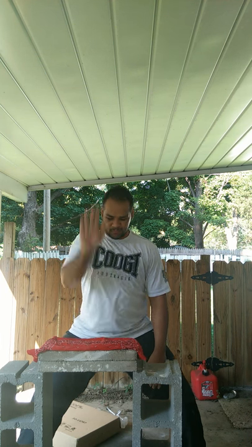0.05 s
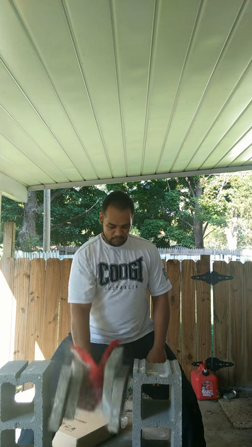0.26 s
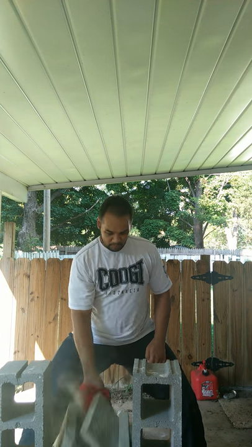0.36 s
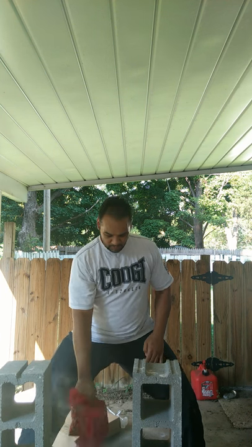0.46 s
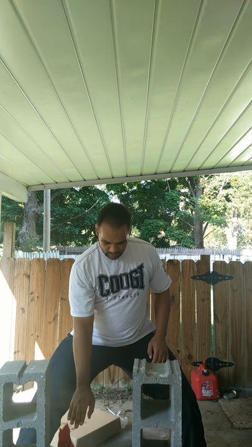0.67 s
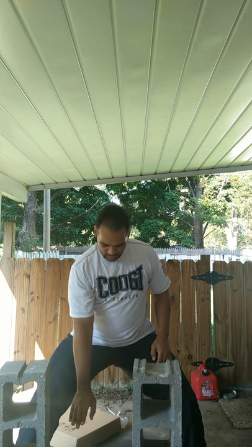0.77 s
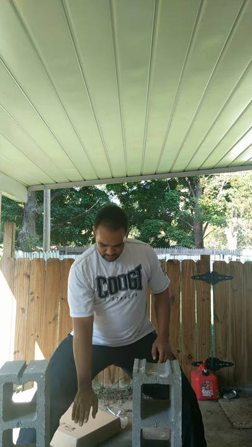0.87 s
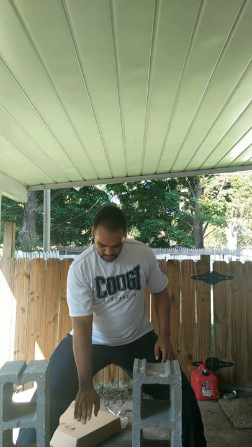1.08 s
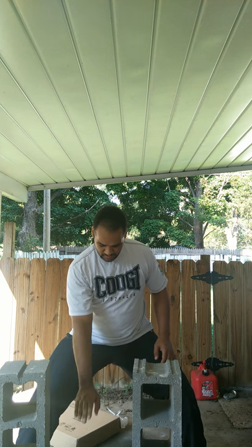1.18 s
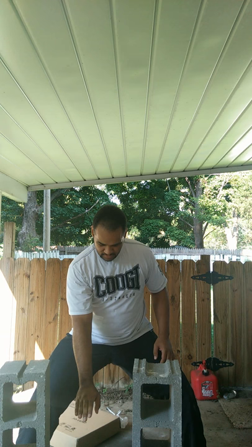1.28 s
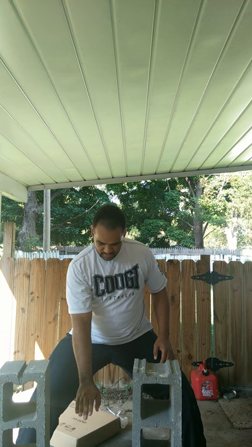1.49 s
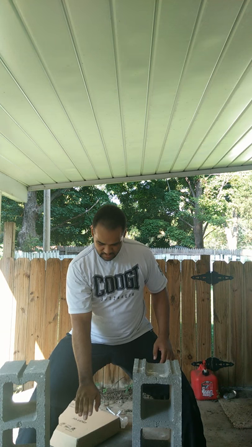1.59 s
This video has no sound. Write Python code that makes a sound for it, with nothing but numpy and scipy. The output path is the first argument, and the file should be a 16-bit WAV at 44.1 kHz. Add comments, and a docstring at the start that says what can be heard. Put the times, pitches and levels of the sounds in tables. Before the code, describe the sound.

Concrete breaks with one loud crack, close to the microphone on a covered patio. The pieces knock and grind as they fall, hit a cardboard box and topple onto paving, rocking to rest against a faint outdoor hiss and rumble.

```python
"""A faint high hiss and low rumble lie outdoors; then a hand snaps two stacked concrete slabs.
The halves knock and grind together as they drop, thud onto a cardboard box, topple on the paving
and rock to rest. Each impact is an impulse with a burst of crumbling, and some leave a half ringing
in its normal modes. A patio roof reflects each blow, and a small microphone close by overloads."""
import sys
import numpy as np
from scipy import signal
from scipy.fft import rfft, irfft
from scipy.io import wavfile

SR = 44100
rng = np.random.default_rng(int(sys.argv[2]) if len(sys.argv) > 2 else 0)


def store_wav(level_fs):
    """Save 16-bit WAV to argv[1]."""
    pcm = np.round(np.clip(np.atleast_2d(level_fs), -1, 1) * 32767)
    wavfile.write(sys.argv[1], SR, pcm.T.astype(np.int16))


N = 72765


def amp(db):
    """Amplitude ratio of a level in decibels."""
    return 10 ** (np.asarray(db) / 20)


def unit_rms(x):
    """Normalisation to an rms of 1."""
    return x / np.sqrt(np.mean(abs(x) ** 2) + 1e-20)


def curve_at(points, hz):
    """Interpolation of (f, value) points on a logarithmic frequency axis."""
    f, value = np.transpose(points)
    return np.interp(np.log(hz + 1), np.log(f), value)


def add(mix, start_s, sound):
    """Superposition: a sound adds to the mix from its onset."""
    part = mix[round(start_s * SR):][:len(sound)]
    part += sound[:len(part)]


def coloured(x, spectrum, edge_hz, size=4096):
    """Minimum-phase filtering to a spectrum, with a third-order roll-off above the edge."""
    hz = abs(np.fft.fftfreq(size, 1 / SR))
    gain = amp(curve_at(spectrum, hz)) / np.sqrt(1 + (hz / edge_hz) ** 6)
    log_response = np.conj(signal.hilbert(np.log(gain + 1e-5)))
    taps = np.fft.ifft(np.exp(log_response)).real
    return signal.fftconvolve(x, taps[:size // 2])


def equalised(x, spectrum):
    """Zero-phase filtering of a full-length signal to a spectrum."""
    return irfft(rfft(x) * amp(curve_at(spectrum, np.fft.rfftfreq(N, 1 / SR))), N)


# Spectrum of the outdoor background: f/Hz, level/dB
OUTDOOR_SPECTRUM = [(25, -23), (40, -11.5), (58, -4), (80, -5), (130, -12), (250, -21.5), (450, -27.5),
                    (1000, -27.5), (2000, -30), (3000, -31), (3500, -14), (5100, -3), (6000, -6),
                    (7100, -14.5), (9000, -7.5), (10300, -19.5), (11400, -15), (12500, -26), (16000, -50.5)]
def outdoors(level_db=-48, swell_db=0.66):
    """Ambient noise, weakly modulated: a high hiss, likely insects in the trees, over a distant rumble."""
    t = np.arange(N) / SR
    air = equalised(rng.standard_normal(N), OUTDOOR_SPECTRUM)
    swell = sum(np.sin(2 * np.pi * (hz * t + rng.random())) for hz in np.geomspace(1, 25, 20))
    return amp(level_db + swell_db * unit_rms(swell)) * unit_rms(air)


# Early reflections off floor and roof: delay/s, amplitude ratio
ECHOES = [(.0047, .25), (0.0145, .3), (.0225, .12)]
# Reverberation time of the patio: f/Hz, T60/s
PATIO_T60 = [(60, 0.29), (150, 0.39), (400, 0.31), (1000, 0.2), (2800, 0.28), (6000, .22), (12000, 0.22)]
# Hollow resonances of the patio: f/Hz, level/dB, T60/s
HOLLOWS = [(108, -12, 1.2), (138, -4, .9), (210, -4, .42), (274, -9, .3), (412, -14, .3), (465, -3, .6),
           (628, -9, .3), (807, 0, .45)]
def patio(x, tail_db=-3.5, rise_s=0.0029):
    """Convolution with an impulse response: a diffuse tail, early reflections and damped resonances."""
    t = np.arange(SR) / SR
    reflections = rng.standard_normal(SR) * (rng.random(SR) < .15)
    hz, frame_s, bands = signal.stft(reflections, SR, nperseg=256)
    decay = amp(-60 * frame_s / curve_at(PATIO_T60, hz)[:, None])
    tail = signal.istft(bands * decay, SR, nperseg=256)[1][:SR]
    tail *= np.minimum(t / rise_s, 1) ** 2
    response = amp(tail_db) * tail / np.linalg.norm(tail)
    for delay_s, gain in ECHOES:
        add(response, delay_s, np.array([gain]))
    for mode_hz, db, t60 in HOLLOWS:
        scale = 2 * np.log(1000) / (t60 * SR)  # makes db the gain at resonance
        response += scale * amp(db - 60 * t / t60) * np.cos(2 * np.pi * mode_hz * t)
    return signal.fftconvolve(x, response)[:N]


# Showers of concrete crumbs: t/s, duration/s, level/dB, treble edge/Hz
SHOWERS = [(0.440, 0.32, -34.5, 6990), (0.467, 0.039, -43, 8000), (0.576, 0.0322, -20, 14000),
           (0.59, 0.044, -21, 13000), (0.655, 0.13, -34.5, 12000), (0.82, 0.068, -39, 14100),
           (0.959, 0.035, -28, 8000)]
# Spectrum of the crumbs: f/Hz, level/dB
GRIT_SPECTRUM = [(100, -20), (500, -9), (1400, -2.5), (2600, -4.5), (3300, -5.5), (4400, -5.5),
                 (5000, -5.5), (5900, 2.5), (7000, -13), (9000, -6.5), (11400, -1), (12600, -8.5),
                 (15000, -34)]
def grit(grains_per_s=2700, spread_db=4.5, rise_s=.005, fade_db=-5):
    """Shot noise: crumbs scrape and scatter as tiny clicks of random timing and size."""
    out, size = np.zeros(N), SR // 2
    for start_s, length_s, db, edge_hz in SHOWERS:
        t = np.arange(0, length_s, 1 / SR)
        clicks = (rng.random(size) < grains_per_s / SR) * rng.choice([-1, 1], size)
        clicks = clicks * amp(spread_db * np.minimum(rng.exponential(1, size), 4))
        envelope = np.minimum(t / rise_s, 1) * amp(fade_db * t / length_s)
        shower = coloured(clicks[:len(t)] * envelope, GRIT_SPECTRUM, edge_hz)
        add(out, start_s, amp(db) * shower / np.linalg.norm(shower) * np.sqrt(len(t) / 2))
    return out


def mode(hz, db, t60, rise_s=0.0031, waver_depth=.7, waver_share=.014):
    """Damped oscillation that wavers as the piece tumbles, at a rate proportional to its frequency."""
    t = np.arange(SR // 2) / SR
    steps = (rng.standard_normal(192) + 1j * rng.standard_normal(192)) / np.sqrt(2)
    waver = np.interp(t * 2 * waver_share * hz, np.arange(len(steps)), steps)
    phasor = np.exp(2j * np.pi * (hz * t + rng.random()) - np.log(1000) * t / t60)
    tone = ((1 + waver_depth * waver) * phasor).real
    return np.sqrt(2) * amp(db) * tone * np.minimum(t / rise_s, 1)


# Pings of small chips: t/s, f/Hz, level/dB, T60/s
CHIPS = [(0.4640, 10460, -42, .12), (0.4880, 4340, -46, .2), (0.5360, 4500, -33, .11),
         (0.5490, 4339, -37, .1), (0.5745, 8880, -20, .1), (0.5755, 8520, -26, .12),
         (0.7370, 10987, -34, .17), (0.7390, 10420, -40, .2), (0.8250, 10400, -39, .28),
         (0.8380, 11350, -40, .2), (0.8300, 2510, -41, .38), (1.0450, 3010, -45, .35),
         (1.0480, 2520, -45, .22), (1.1800, 3830, -47, .2)]
def pinging_chips():
    """Free vibration in a single mode: each chip gives one high, dying tone."""
    out = np.zeros(N)
    for start_s, hz, db, t60 in CHIPS:
        add(out, start_s, mode(hz, db, t60))
    return out


# Normal modes of the four broken halves: half (0-3), f/Hz, level/dB, T60/s
HALF_MODES = [ (0, 974, -17, .2), (0, 1203, 0, .22), (0, 2466, -9, .18), (0, 2729, -9, .18),
              (0, 5383, -13, .16), (0, 5740, -6, .19), (0, 6158, -12, .19), (0, 11200, -17, .16),
              (1, 2008, -14, .7), (1, 2390, 2, .3), (1, 2654, -8, .43), (1, 3850, -3.5, .33),
              (1, 4043, -12, .33), (1, 5660, -5, .3), (1, 5938, -1, .22), (1, 6110, -2, .33),
              (1, 9911, -14, .2), (1, 11500, -14, .15), (2, 1100, -5, .3), (2, 1335, -2, .3),
              (2, 1550, -4, .3), (2, 1707, -8, .3), (2, 2380, 2, .2), (2, 2446, 0.5, .31),
              (2, 2977, -20, .28), (2, 3800, -15, .4), (2, 5658, -9, .33), (3, 2514, 0.5, .26),
              (3, 2600, -1, .14), (3, 3010, -15, .42), (3, 3354, -3, .18), (3, 3830, -6, .35),
              (3, 4064, -7, .3), (3, 5459, -4, .25), (3, 5690, 2, .3), (3, 6142, -5, .3),
              (3, 8920, -7, .22), (3, 10401, -10, .25), (3, 11795, -9, .2)]
# Excitations of the halves: t/s, half (rounded; silent outside 0-3), level/dB
EXCITATIONS = [(0.2227, 0, -25), (0.3538, 0, -20.5), (0.3984, 1, -26.5), (0.469, 0.5, -40),
               (0.5900, 1, -28), (0.643, 2, -23), (0.6760, 2, -18.5), (0.7520, 2.5, -30.5),
               (0.8350, 3.5, -45), (0.9560, 3, -32.5), (1.1800, 3, -55)]
def ringing_halves():
    """Modal superposition: a struck half rings in all of its own modes at once."""
    out = np.zeros(N)
    for start_s, struck, strike_db in EXCITATIONS:
        for half, hz, mode_db, t60 in HALF_MODES:
            if half == round(struck):
                add(out, start_s, mode(hz, strike_db + mode_db, t60))
    return out


def impacts(events, spectrum, crumble_ratio=1.5):
    """Impulsive excitation: each blow is a clean contact plus exponentially decaying crumbling noise."""
    out, t = np.zeros(N), np.arange(SR // 20) / SR
    for start_s, db, edge_hz, crumble_s in events:
        crumbs = coloured(rng.standard_normal(len(t)) * np.exp(-t / crumble_s), spectrum, edge_hz)
        contact = coloured(1. * (t == 0), spectrum, edge_hz)
        blow = contact / np.linalg.norm(contact) + crumble_ratio * crumbs / np.linalg.norm(crumbs)
        blow *= np.sqrt(SR / 100) / np.linalg.norm(blow)  # the energy of 10 ms at rms 1
        add(out, start_s, amp(db) * blow)
    return out


# Thuds on the box, first pieces landing, then the box shifting: t/s, level/dB, treble edge/Hz, crumble time/s
THUDS = [(0.5742, -17.5, 650, .002), (0.5790, -21, 1800, .005), (0.5885, -18, 420, .002),
         (0.5938, -16, 2500, .003), (0.6042, -19, 750, .002), (0.6185, -17.5, 1200, .003),
         (0.6330, -22.5, 2500, .005), (1.0020, -45, 260, 0.0074), (1.0800, -52.5, 220, .012),
         (1.1900, -53, 250, 0.0079), (1.2750, -56, 249.4, .012)]
# Spectrum of a box thud: f/Hz, level/dB
THUD_SPECTRUM = [(25, -36), (60, -20), (100, -15), (140, -5), (220, -2.5), (400, 0), (800, -0.5),
                 (1100, -5), (1600, 2.5), (2200, -18.5), (5000, -24.5), (15000, -55)]
def box_thuds():
    """Impact on a compliant surface: pieces land on cardboard with little treble, and later the box shifts in
    soft low thuds."""
    return impacts(THUDS, THUD_SPECTRUM)


# Knocks on the paving: t/s, level/dB, treble edge/Hz, crumble time/s
KNOCKS = [(0.6420, -17, 2570, 0.0031), (0.6455, -10.5, 3500, .002), (0.6480, -10.5, 3500, 0.0011),
          (0.6715, -16, 2970, 0.0013), (0.6752, -9, 4200, .0012), (0.6812, -16.5, 4500, .003),
          (0.6975, -25, 8020, .002), (0.7090, -19, 3000, .001), (0.7150, -18.5, 2980, .001),
          (0.7325, -28, 6000, 0.0013), (0.7515, -28, 2530, 0.00056), (0.7556, -15.5, 2500, 0.0018),
          (0.7860, -30, 2500, .002), (0.8000, -28.5, 2916, 0.00079), (0.8155, -30, 1900, 0.00064),
          (0.8450, -33.5, 2000, 0.0077), (1.0013, -29, 1380, .001), (1.0057, -26.5, 1400, 0.0018),
          (1.0108, -28, 1360, .001), (1.0520, -40.5, 2010, .003), (1.1150, -47, 700, .005),
          (1.1780, -36.5, 1690, 0.0034), (1.1835, -33, 1600, .003), (1.1890, -34, 1700, 0.0068),
          (1.2280, -47, 1300, .003), (1.2580, -46, 680, .007), (1.3410, -50.5, 950, .005),
          (1.3530, -49, 820, .007), (1.3880, -58.5, 1000, .004)]
# Spectrum of a knock: f/Hz, level/dB
KNOCK_SPECTRUM = [(40, -34.5), (110, -25.5), (200, -17), (320, -15.5), (470, -1), (620, -4.5), (850, 1),
                  (1400, 2), (1900, -5), (2500, -8), (3100, -19.5), (3900, -13.5), (4700, -19), (5700, -3),
                  (7000, -22.5), (11500, -21.5), (15000, -44)]
def paving_knocks():
    """Inelastic collisions: pieces topple and rock to rest, the knocks growing weaker and duller."""
    return impacts(KNOCKS, KNOCK_SPECTRUM)


# Collisions between the halves: t/s, level/dB, treble edge/Hz, crumble time/s
CLACKS = [(0.3497, -24, 6950, 0.006), (0.3543, -18, 7000, 0.0069), (0.3603, -21.5, 12000, 0.0029),
          (0.3943, -26, 2000, 0.0017), (0.3980, -19, 4600, 0.0032), (0.4030, -19, 12000, 0.008),
          (0.9505, -30.5, 3200, 0.0028), (0.9543, -24, 3750, 0.0021)]
# Spectrum of a collision: f/Hz, level/dB
CLACK_SPECTRUM = [(40, -32), (150, -16.5), (300, -18), (600, -8.5), (1100, 0.5), (1800, -0.5), (2200, -13),
                  (2600, -6.5), (3200, -13), (3900, -6), (4700, -13.5), (5900, 6), (7000, -14.5),
                  (9000, -15), (11000, -9.5), (12500, -21), (15000, -44.5)]
def clacking_halves():
    """Impact of stiff bodies: the brief contact of concrete on concrete gives a bright clack."""
    return impacts(CLACKS, CLACK_SPECTRUM)


# Cracks through the slabs: t/s, level/dB, treble edge/Hz, crumble time/s
CRACKS = [(0.2210, -14, 4510, 0.0012), (0.2243, -6.5, 12960, 0.0022), (0.2292, -16.5, 7000, 0.0006),
          (0.2360, -24.5, 9040, .001), (0.2470, -27.5, 12000, .004), (0.2720, -32.5, 2636, 0.0027)]
# Spectrum of a crack: f/Hz, level/dB
CRACK_SPECTRUM = [(40, -42.5), (110, -24.5), (180, -9), (300, -10.5), (600, -7), (1000, -4), (1500, -1),
                  (2200, -8.5), (3300, -14), (4500, -11.5), (5700, 2.5), (7200, -8.5), (9500, -13.5),
                  (11200, 3), (12500, -11), (15000, -27)]
def snapping_slabs():
    """Brittle fracture: the slabs release their strain in a quick run of broadband cracks."""
    return impacts(CRACKS, CRACK_SPECTRUM)


def scene(low_cut_hz=55):
    """Superposition of direct and reflected sound; small pieces radiate little deep bass."""
    concrete = snapping_slabs() + clacking_halves() + box_thuds() + paving_knocks() + grit()
    concrete = signal.sosfilt(signal.butter(2, low_cut_hz, "highpass", fs=SR, output="sos"), concrete)
    return (concrete + patio(concrete) + ringing_halves() + pinging_chips() + outdoors())[None]


# Overall tone, with the highest treble dulled above about 12.5 kHz: f/Hz, level/dB
TREBLE_ROLLOFF = [(100, -0.5), (11500, 0), (12400, -1), (13200, -12.5), (16000, -15)]
def record(dry, ceiling=0.89, cutoff_hz=15800):
    """Saturation and band limiting: the loudest peaks clip, and the top octave falls away."""
    clipped = np.clip(dry, -ceiling, ceiling)
    dulled = equalised(clipped, TREBLE_ROLLOFF)
    lowpass = signal.firwin(511, cutoff_hz, window=("kaiser", 9), fs=SR)
    return signal.oaconvolve(dulled, lowpass[None], "same")


dry = scene()
out = record(dry)
store_wav(out)
```